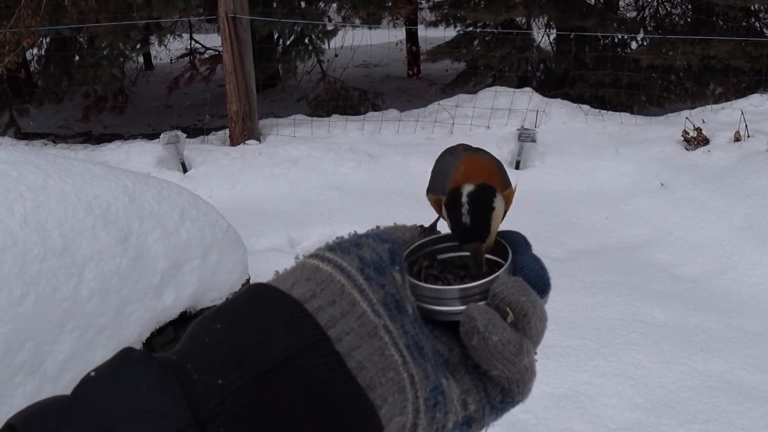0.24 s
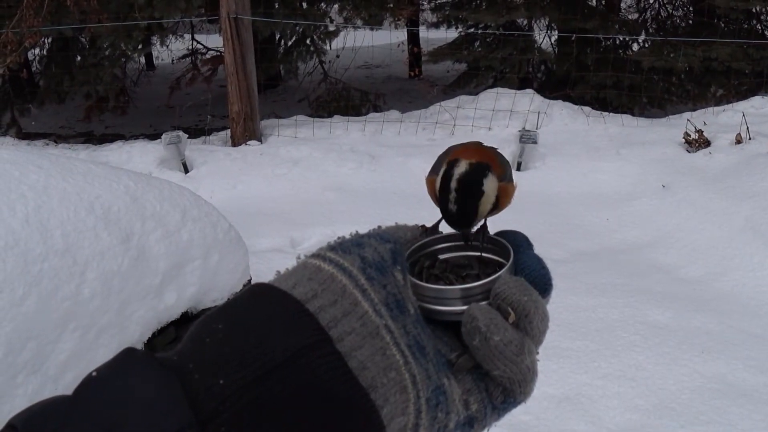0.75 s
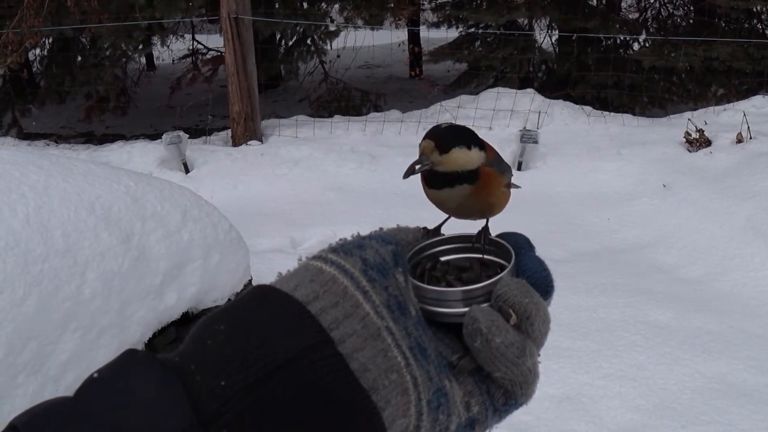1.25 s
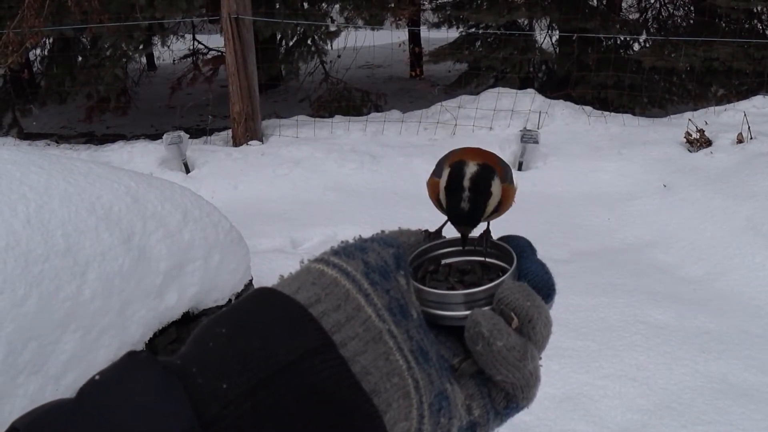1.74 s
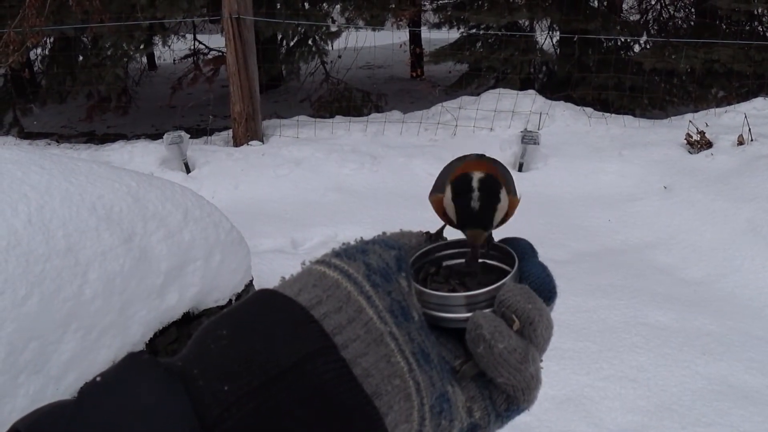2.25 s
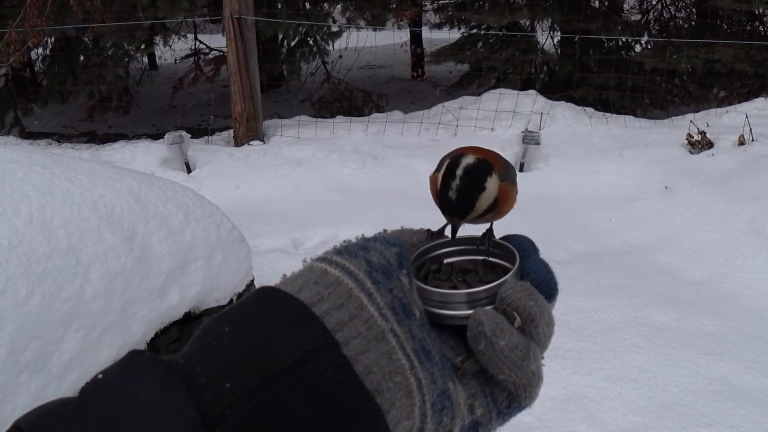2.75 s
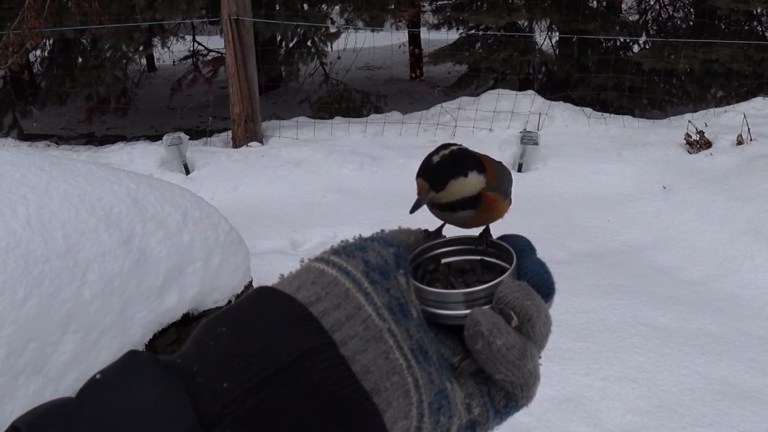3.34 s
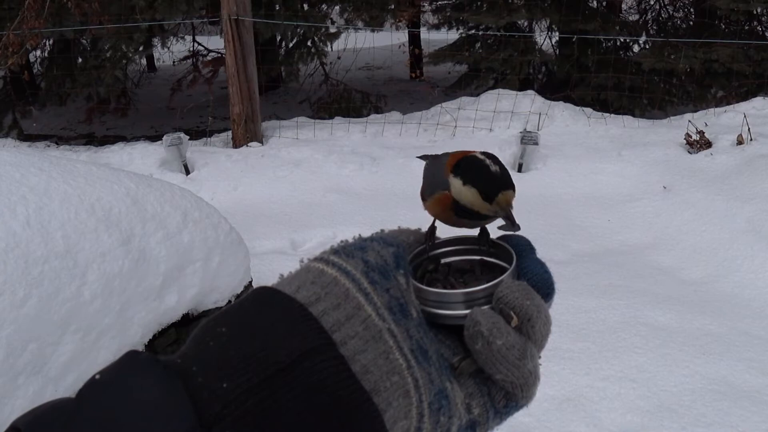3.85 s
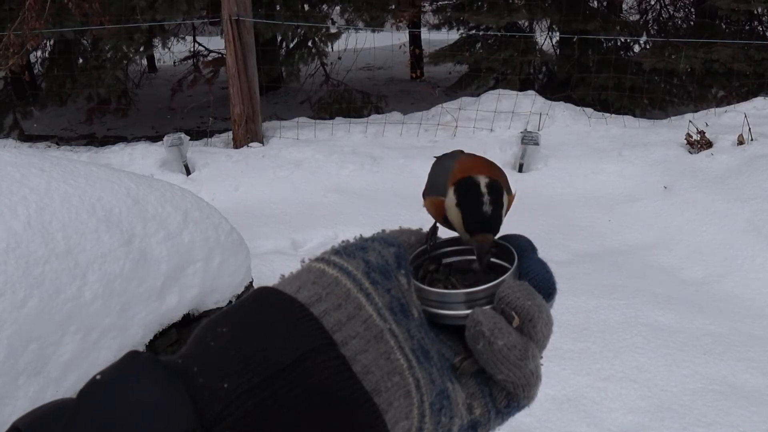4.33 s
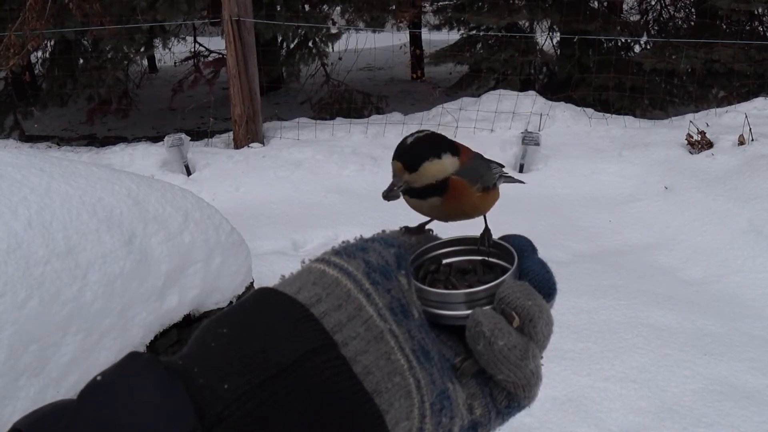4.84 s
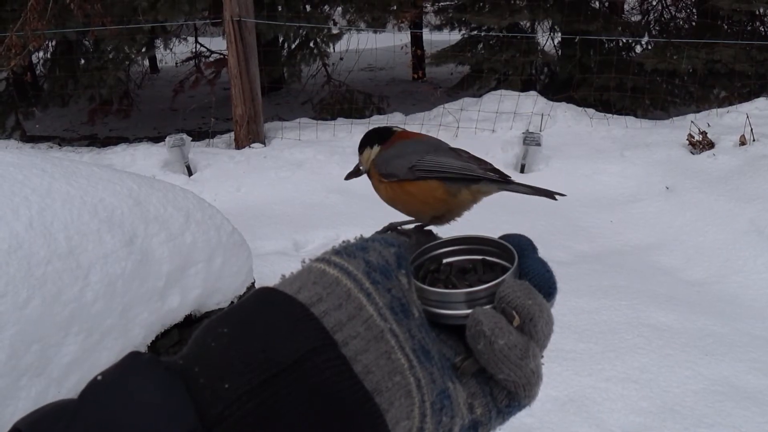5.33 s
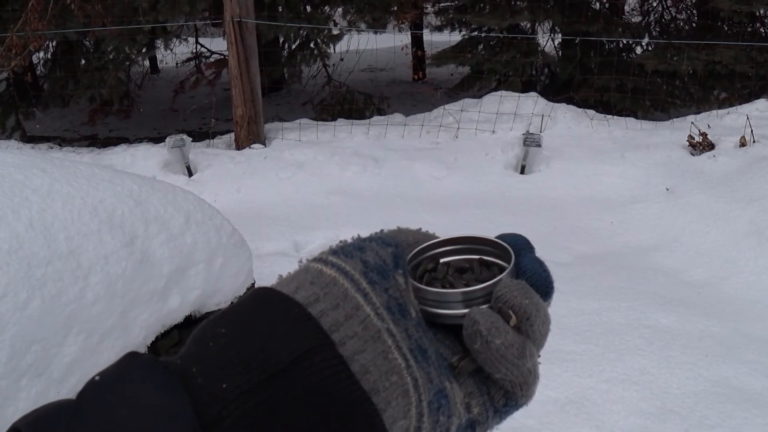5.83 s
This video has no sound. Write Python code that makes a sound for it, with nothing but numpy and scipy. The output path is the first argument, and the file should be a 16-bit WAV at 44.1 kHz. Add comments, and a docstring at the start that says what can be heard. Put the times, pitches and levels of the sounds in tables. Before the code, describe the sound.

Crisp beak taps and tiny seed rattles ring a little metal cup, with brief high bird calls, faint distant answers and a soft wing flurry at the end.

```python
"""A soft, wide hush of winter air lies under everything: coloured noise, drifting slightly, unlike in each ear.
A small tit on a gloved hand calls, and pecks seeds in a little steel tin: skidding blows ring its modes.
Peeps and answers from the trees are gliding near-sines; thuds, rubbing and rumble of the hand are low noise.
At the end the bird flies off on fading wingbeats, each a pulse of air and a feathery swish.
"""
import sys
import numpy as np
from scipy import signal
from scipy.fft import rfft, irfft, next_fast_len
from scipy.io import wavfile
from scipy.ndimage import uniform_filter1d

SR = 44100
rng = np.random.default_rng(int(sys.argv[2]) if len(sys.argv) > 2 else 0)


def unload_audio(sound):
    """Save the sound as a 16-bit wav file, at the path given as the first command line argument."""
    columns = np.transpose(np.atleast_2d(sound))
    # keep every value between -1 and 1, then stretch to whole-number steps
    steps = np.round(np.clip(columns, -1, 1) * 32767)
    wavfile.write(sys.argv[1], SR, steps.astype(np.int16))


N = 268348


def gain_of(db):
    """Decibels to amplitude."""
    return 10 ** (np.asarray(db) / 20)


def evened(x):
    """Scales to rms 1."""
    return x / np.sqrt(np.mean(x ** 2) + 1e-20)


def read(points, hz):
    """A spectrum joined by straight lines on a log-frequency axis."""
    f, value = np.transpose(points)
    return np.interp(np.log(hz + 1), np.log(f + 1), value)


def add(mix, s, sound):
    """Mixes a sound in at time s."""
    part = mix[max(round(s * SR), 0):][:len(sound)]
    part += sound[:len(part)]


def passband(low_hz, high_hz, order=2):
    """Design of a causal band-pass."""
    return signal.butter(order, [low_hz, min(high_hz, .49 * SR)], "band", fs=SR, output="sos")


def band(x, low_hz, high_hz, order=2):
    """Causal band-pass."""
    return signal.sosfilt(passband(low_hz, high_hz, order), x)


def ring(x, hz, width_hz):
    """One resonance with a peak gain of 1."""
    return signal.lfilter(*signal.iirpeak(hz, hz / width_hz, fs=SR), x)


def strokes(rows):
    """Level curve of smooth swells, one a row: middle, length, level."""
    level = np.zeros(N)
    for s, length, db in rows:
        swell = np.hanning(max(int(length * SR), 8))
        add(level, s - len(swell) / 2 / SR, gain_of(db) * swell)
    return level


def aftermath(rows, rise_s, decay_s):
    """Level curve that rises quickly at each (s, dB) and dies away; overlaps add in power."""
    power, t = np.zeros(N), np.arange(SR) / SR
    for s, db in rows:
        level = gain_of(db) * (1 - np.exp(-t / rise_s)) * np.exp(-t / decay_s)
        add(power, s, level ** 2)
    return np.sqrt(power)


def ticks(count, per_s, spread_db):
    """Tiny random snaps, a few larger than the rest."""
    struck = rng.random(count) < per_s / SR
    sign = rng.choice([-1, 1], count)
    return struck * sign * gain_of(spread_db * np.minimum(rng.exponential(1, count), 3))


# tonal balance of the still air: f/Hz, density/dB (relative, per Hz)
AIR_COLOUR = [(25, -46), (55, -40), (90, -19), (130, -20), (212, -7), (397, -1), (700, -1), (1740, -9.5),
              (2100, -13), (5250, -21), (8660, -21.5), (10100, -19.5), (11050, -23.5), (11500, -63),
              (12500, -80)]
# likeness of left and right: f/Hz, correlation/1
AIR_LIKENESS = [(60, 1), (130, 0.71), (270, 0.97), (580, 0.42), (1200, -0.37), (2600, -0.5), (5500, -0.016),
                (11000, 0.39)]
# lean of the air to the left: f/Hz, left minus right/dB
AIR_LEAN = [(60, 0.5), (110, 0.5), (190, 1.1), (350, 4.0), (630, 6.3), (1130, 3.3), (2030, 2.3),
            (3650, 0.38), (6560, 1.3), (11800, 4.1)]
# narrow bands lifted in the hiss: f/Hz, width/Hz, lift/dB
HISS = [(1923, 71, 7.5), (10250, 1280, 8)]
AIR_DB = -62  # rms of the two ears' mean


def air(patchy_db=1.0):
    """A far, even hush: noise with a fixed colour whose level drifts a little in time and pitch."""
    frames, hz = N // 512 + 5, np.fft.rfftfreq(2048, 1 / SR)
    a, b, c, d, patches = rng.standard_normal((frames, len(hz), 5)).T
    patches = evened(uniform_filter1d(uniform_filter1d(patches, 20, 0), 10, 1))
    same = np.clip(read(AIR_LIKENESS, hz), -1, 1)[:, None]
    side = gain_of(read(AIR_LEAN, hz))[:, None]
    left = a + 1j * b
    right = same * left + np.sqrt(1 - same ** 2) * (c + 1j * d)
    # keep the colour of the two ears' mean whatever their likeness
    ears = np.array([side * left, right]) / np.sqrt(1 + side ** 2 + 2 * same * side)
    lift_db = sum(db * np.exp(-(2 * (hz - f) / width) ** 2) for f, width, db in HISS)
    colour_db = read(AIR_COLOUR, hz) + lift_db
    spectrum = ears * gain_of(colour_db[:, None] + patchy_db * patches)
    hush = signal.istft(spectrum, nperseg=2048, noverlap=1536)[1][:, :N]
    return hush / hush.mean(0).std() * gain_of(AIR_DB)


# the hand trembles: at rest/dB, re a bump/dB, re a peck/dB, at take-off/dB
REST_DB, BUMP_SHAKE_DB, PECK_SHAKE_DB, TAKEOFF_SHAKE_DB = -105, -15.5, -49, -80
SHAKE_RISE_S, SHAKE_DECAY_S = 0.011, 0.083


def handling(lumpy_db=4.5):
    """Low, uneven rumble of the hand, stirred by every bump, peck and the take-off."""
    shared, left, right = band(rng.standard_normal((3, N)), 42, 169, order=3)
    tremor = evened(band(rng.standard_normal(N), 2.4, 13))
    jolts = [(s, db + BUMP_SHAKE_DB) for s, db, _ in HAND_BUMPS]
    jolts += [(s, db + PECK_SHAKE_DB) for s, db, *_ in BEAK_PECKS]
    jolts += [(TAKEOFF_S, TAKEOFF_SHAKE_DB)]
    level = gain_of(REST_DB) + aftermath(jolts, SHAKE_RISE_S, SHAKE_DECAY_S)
    rumble = evened(shared + 1.16 * np.array([left, right]))
    return rumble * level * gain_of(lumpy_db * np.tanh(tremor))


def whistle(hz, waver=0.0046, half_db=-19):
    """The syrinx sings a near sine; on a held pitch alternate cycles differ: a faint octave below."""
    hz = uniform_filter1d(hz, 130)
    drift = evened(uniform_filter1d(rng.standard_normal(len(hz)), 90))
    held = np.exp(-(np.gradient(hz) * SR / 30000) ** 2)
    phase = 2 * np.pi * np.cumsum(hz * (1 + waver * drift)) / SR
    octave_below = gain_of(half_db) * held * np.sin(phase / 2)
    return np.sqrt(2) * (np.sin(phase) + octave_below)


# calls that flick up, overshoot and hold: t/s, length/s, flick level/dB, held level/dB
FLICKED_CALLS = [(0.162, 0.094, -46, -60.5), (1.667, .083, -56, -54)]
CALL_START_HZ, CALL_HOLD_HZ, CALL_SWING_HZ, CALL_SETTLE_S = 5930, 7670, 30, .011
FLICK_S = 0.0064  # passage from flick to held level


def long_calls():
    """An upward flick, louder or softer than the hold, overshoots and settles like a damped spring."""
    out = np.zeros(N)
    for s, length, flick_db, hold_db in FLICKED_CALLS:
        t = np.arange(0, length, 1 / SR)
        swing = np.exp(-t / CALL_SETTLE_S) * np.cos(2 * np.pi * CALL_SWING_HZ * t)
        hz = CALL_HOLD_HZ + (CALL_START_HZ - CALL_HOLD_HZ) * swing
        level_db = hold_db + (flick_db - hold_db) * np.exp(-(t / FLICK_S) ** 2)
        add(out, s, whistle(hz) * gain_of(level_db) * signal.windows.tukey(len(t), .1))
    return out


# wall ring, moving with the spot struck, before detuning: multiple of wall pitch/1, width/Hz, level/dB
WALL_MODES = [(.76, 500, -10), (.9, 380, 1.5), (1, 415, 2), (1.17, 490, 0)]
# rim ring, damped by seeds and glove, before RIM_PITCH and detuning: f/Hz, width/Hz, level/dB
RIM_MODES = [(6450, 650, -5), (6950, 390, 1.5), (7490, 280, -1.5), (8130, 380, 2.5), (8350, 350, 2.5),
             (10230, 150, -1.5), (10820, 350, -4.5)]
RIM_PITCH = 0.98
# the range in which each part of the tin sounds: low f/Hz, high f/Hz
FLOOR_RANGE_HZ, WALL_RANGE_HZ, RIM_RANGE_HZ = (1096, 2600), (3120, 6230), (5560, 11800)


def clicks(contacts, floor_width_hz=520, skid=0.16, swell=0.056, swell_s=0.0011, snap=0.27,
           wall_snap=0.21, knock=0.048, uneven_db=2.5, detune=0.027):
    """A sharp blow, with a brief noisy swell into it and a short skid, rings floor, wall and rim."""
    out, t = np.zeros(N), np.arange(-128, 640) / SR
    ranges = passband(*FLOOR_RANGE_HZ), passband(*WALL_RANGE_HZ), passband(*RIM_RANGE_HZ, order=3)

    def answer(blow, modes, pitch):
        """Each mode answers with a slightly random level and pitch at every contact."""
        total = 0
        for k, (f, width, db) in enumerate(modes):
            gain = (-1) ** k * gain_of(db + uneven_db * rng.standard_normal())
            hz = f * pitch * (1 + detune * rng.uniform(-1.34, 1))
            total = total + gain * ring(blow, hz, width)
        return total

    for s, db, floor_db, rim_db, floor_hz, wall_hz, skid_s in contacts:
        rub = np.where(t < 0, swell * np.exp(-abs(t) / swell_s), skid * np.exp(-abs(t) / skid_s))
        blow = (t == 0) + rub * rng.standard_normal(len(t))
        # a blow that reaches the bare floor rings lower and longer than one cushioned by seeds
        floor = ring(blow, floor_hz, floor_width_hz * min(floor_hz / 2000, 1) ** 4)
        # the dry snap of the husk fills the valleys between the modes
        rings = (floor + knock * blow,
                 answer(blow, WALL_MODES, wall_hz) + wall_snap * blow,
                 answer(blow, RIM_MODES, RIM_PITCH) + snap * blow)
        click = np.zeros(len(t))
        for sos, x, part_db in zip(ranges, rings, (floor_db, 0, rim_db)):
            part = signal.sosfilt(sos, x)
            click += gain_of(db + part_db) * part / np.linalg.norm(part)
        add(out, s + t[0], click * np.sqrt(SR / 1000))  # levels are energy spread over a millisecond
    return out


# spacing of the jostled seeds, their fall over a rattle, their unevenness
RATTLE_STEP_S, RATTLE_FADE_DB, RATTLE_SPREAD_DB = .0042, -8.5, 4.5
RATTLE_FLOOR_DB, RATTLE_RIM_DB = -4, 0  # re their level on the wall
LIGHT_FLOOR_HZ, LIGHT_WALL_HZ = 2130, 4450  # how the tin answers a light knock
GRIP_SKID_S, STRIKE_SKID_S, SEED_SKID_S = 0.00038, 0.00054, 0.00095  # decay of each sliding contact


def rattle(s, db, length, count=9):
    """Jostled seeds knock at uneven steps, on the whole ever more weakly."""
    for k, (late, strength, spot) in enumerate(rng.uniform(-1, 1, (count, 3))):
        after = RATTLE_STEP_S * (k + 1 + .3 * late)
        fall_db = RATTLE_FADE_DB * min(after / length, 3) ** 2 + RATTLE_SPREAD_DB * strength
        floor_hz, wall_hz = LIGHT_FLOOR_HZ * (1 + 0.091 * spot), LIGHT_WALL_HZ * (1 - 0.082 * spot)
        yield s + after, db + fall_db, RATTLE_FLOOR_DB, RATTLE_RIM_DB, floor_hz, wall_hz, SEED_SKID_S


# beak strikes, each with a second closing and a rattle of seeds:
# t/s, strike level on the wall/dB, floor re wall/dB, rim re wall/dB, floor f/Hz, wall f/Hz,
# grip delay/s, grip re strike/dB, rattle re strike/dB, rattle length/s
BEAK_PECKS = [(0.188, -45, -13, 1.5, 2060, 4550, .0028, 4, 3, 0.0064),
              (0.1985, -35.5, -10.5, 2, 1970, 5100, .0056, -18, -18, 0.018),
              (0.4919, -37, 2, 2.5, 2000, 4740, 0.0082, 0.5, -28, 0.0089),
              (0.8838, -37.5, 3, 4, 2000, 4450, .002, 1, -12, .004),
              (0.8884, -29, 5.5, 5.5, 1660, 4260, .0019, -1, -6, 0.027),
              (0.9612, -37, 5, 4, 2060, 4200, .014, -5, -2, .018),
              (.9991, -41, -7, -5, 2130, 4170, .0069, -7, -22, .01),
              (1.429, -43.5, -0.5, 3, 2120, 4270, .002, 3.5, -5, 0.019),
              (2.1479, -31.5, 7.5, 9.5, 1890, 4660, .006, -15, 1.5, 0.009),
              (2.189, -43, -5, -0.5, 2200, 4100, 0.0077, -6, -16, .01),
              (2.2329, -33.5, 0, 6.5, 2060, 4800, 0.0052, 2.5, -14, .01),
              (2.2578, -45.5, -7, -14, 1990, 4600, .0038, 0.5, -11, 0.0089),
              (2.6184, -46.5, 5, 0, 2000, 4420, 0.0031, 6, 6, .014),
              (2.6352, -33, -4.5, -4, 2220, 4320, .0121, -13, -5, 0.0055),
              (3.0446, -39, -1.5, 1, 2150, 4550, 0.0042, -10, -13, 0.0095),
              (3.3735, -42, -5, -2.5, 2050, 4250, 0.0039, 0, -9, 0.013),
              (3.5604, -47.5, 4, -11, 1970, 4400, .0015, -15, -20, .004),
              (3.7038, -35.5, -7, 3.5, 2020, 4320, 0.0061, -3, 0.5, 0.0092),
              (4.0341, -42.5, -9, 2, 2050, 4300, 0.0054, -2, -16, 0.0046),
              (4.0438, -41.5, -12, 1, 2180, 4340, 0.0062, 8, -14, 0.0036),
              (4.2925, -42.5, -7, -13, 2150, 4720, .002, 3, 6, 0.0059)]


def pecks():
    """The beak strikes, grips at the same spot, and stirs the seeds."""
    contacts = []
    for row in BEAK_PECKS:
        s, db, floor_db, rim_db, floor_hz, wall_hz, grip_s, grip_db, rattle_db, rattle_s = row
        spot = floor_db, rim_db, floor_hz, wall_hz
        contacts.append((s, db, *spot, STRIKE_SKID_S))
        contacts.append((s + grip_s, db + grip_db, *spot, GRIP_SKID_S))
        contacts.extend(rattle(s, db + rattle_db, rattle_s))
    return clicks(contacts)


# soft bumps of the hand as the bird shifts: t/s, level/dB, f/Hz
HAND_BUMPS = [(0.231, -58.5, 170), (0.519, -52.5, 130), (.585, -57, 130), (.612, -51.5, 132),
              (0.644, -60, 122), (.84, -61, 150), (0.933, -46.5, 158), (.985, -61, 139), (1.07, -65, 112),
              (1.47, -61.5, 124)]


def bumps(decay_s=0.011):
    """Dull, quickly damped thuds: a low sine roughened by low noise."""
    out, t = np.zeros(N), np.arange(SR // 8) / SR
    for s, db, hz in HAND_BUMPS:
        thud = np.sin(2 * np.pi * hz * t) + 0.78 * evened(band(rng.standard_normal(len(t)), 51, 255))
        add(out, s, gain_of(db) * thud * (1 - np.exp(-t / 0.0019)) * np.exp(-t / decay_s))
    return out


# light single clicks on the tin: t/s, level on the wall/dB, floor re wall/dB, rim re wall/dB
LIGHT_CLICKS = [(0.246, -56.5, -10, 5), (0.268, -57, -11, 2), (0.326, -60, -7, 3), (0.9241, -39.5, -9, 3),
                (0.9917, -50, 1, -12), (1.0609, -57, -14, 3), (1.132, -57, -14, 1.5), (1.46, -52, 1.5, 2),
                (2.1719, -50, -3, -8), (2.2782, -48, 2.5, 2), (2.347, -54, -16, 2), (3.1127, -57, -13, 3),
                (3.172, -58, -13, 5), (3.2503, -58, -13, 2.5), (3.3622, -52, -16, -6),
                (3.7224, -54, -5, -10), (3.775, -55, -16, 3), (3.8288, -52.5, -15, 3),
                (3.894, -54, -16, 2.5), (4.3127, -52, -1, -5), (4.3293, -51, -10, -10),
                (4.3686, -54.5, -6, 1), (4.4303, -51.5, -9, -3.5), (4.4998, -55.5, -6, 2),
                (4.9236, -60.5, 6.5, 1), (5.5317, -46.5, -6, 0.5)]


def light_clicks(skid_s=0.0015):
    """Light single clicks on the tin, from seeds or a small peck, each with a longer skid."""
    return clicks((s, db, floor_db, rim_db, LIGHT_FLOOR_HZ, LIGHT_WALL_HZ, skid_s)
                  for s, db, floor_db, rim_db in LIGHT_CLICKS)


# claws and beak scraping: middle t/s, length/s, level/dB
SCRAPES = [(.39, .009, -62), (1.36, .015, -66.5), (2.215, 0.042, -59.5), (4.74, 0.07, -69),
           (4.827, .02, -66), (4.864, 0.019, -65), (4.94, 0.19, -71), (5.075, 0.046, -68),
           (5.54, 0.055, -62)]
# husks settling: level after a peck of -35 dB, dB per dB of the peck, decay
HUSK_DB, HUSK_FOLLOW, HUSK_S = -66.5, 0.8, 0.042


def scratches():
    """Claws catch and slip, and husks settle after each peck, in clusters of ticks."""
    settling = [(s, HUSK_DB + HUSK_FOLLOW * (db + 35)) for s, db, *_ in BEAK_PECKS]
    husks = aftermath(settling, .004, HUSK_S)
    grit = evened(band(ticks(N, per_s=1300, spread_db=1.5), 3600, 7500))
    return grit * (strokes(SCRAPES) + husks)


# short scooped peeps: t/s, length/s, first f/Hz, last f/Hz, sag in the middle/Hz, level/dB
SCOOPED_PEEPS = [(.397, .016, 5800, 9200, 200, -57.5), (.418, 0.016, 8200, 9000, 1150, -56.5),
                 (.435, 0.022, 7800, 8300, 1500, -62), (0.664, 0.015, 6500, 8250, 300, -65),
                 (0.689, 0.048, 8000, 7800, 798, -70), (.732, .02, 6760, 8400, 300, -66.5),
                 (1.017, .018, 6140, 8500, -600, -63), (1.312, 0.014, 6500, 8600, 250, -66),
                 (1.745, 0.014, 7600, 9100, -400, -63), (5.864, 0.026, 5960, 8000, -900, -63.5)]


def peeps():
    """Thin contact notes, each one scoop or arch of pitch."""
    out = np.zeros(N)
    for s, length, first_hz, last_hz, sag_hz, db in SCOOPED_PEEPS:
        u = np.linspace(0, 1, int(length * SR))
        hz = first_hz + (last_hz - first_hz) * u - sag_hz * np.sin(np.pi * u)
        add(out, s, whistle(hz) * gain_of(db) * signal.windows.tukey(len(u), .5))
    return out


# short answers from the trees: t/s, length/s, first f/Hz, last f/Hz, level/dB
TREE_ANSWERS = [(2.065, 0.048, 6450, 6850, -75), (2.193, 0.063, 8830, 8300, -63),
                (2.522, 0.06, 8700, 8350, -75), (2.955, 0.051, 7550, 6950, -73.5),
                (3.074, 0.051, 7250, 6870, -70.5), (3.265, 0.048, 8650, 8250, -73),
                (3.462, 0.022, 6700, 6820, -69), (4.178, 0.056, 8750, 8250, -70.5),
                (4.60, 0.058, 8600, 8350, -69.5), (4.725, 0.032, 7170, 6500, -68.5),
                (5.694, 0.046, 7100, 6570, -71)]


def answers():
    """Short gliding notes, wavering more, from birds further off."""
    out = np.zeros(N)
    for s, length, first_hz, last_hz, db in TREE_ANSWERS:
        hz = np.linspace(first_hz, last_hz, int(length * SR))
        add(out, s, gain_of(db) * whistle(hz, waver=0.015) * signal.windows.tukey(len(hz), .7))
    return out


# soft rubbing on the wool glove: middle t/s, length/s, level/dB
GLOVE_RUBS = [(4.85, 1, -68), (5.083, 0.059, -59.5), (5.15, .12, -67.5), (5.78, 0.41, -69)]


def glove():
    """Wool rubs dully under the bird's feet: swells of band-passed noise."""
    return evened(band(rng.standard_normal(N), 370, 646, order=3)) * strokes(GLOVE_RUBS)


# take-off: the first full wingbeat, then ever fainter ones as the bird leaves
TAKEOFF_S, WINGBEAT_S, PUSH_DB, SWISH_DB, LEAVING_DB_PER_S = 5.566, .0433, -51.5, -58.5, -55


def wings(push_hz=280, push_s=0.0015, swish_at=0.013, swish_s=0.014, eddy_db=-5, count=6):
    """Each downstroke pushes a pulse of air, then the feathers brush past one another."""
    out, t = np.zeros(N), np.arange(SR // 16) / SR
    for flown_s in np.arange(count) * WINGBEAT_S:
        since = t - .0035
        push = np.sqrt(2) * np.sin(2 * np.pi * push_hz * since) * np.exp(-.5 * (since / push_s) ** 2)
        stroke = np.exp(-.5 * ((t - swish_at) / swish_s) ** 2)
        eddies = gain_of(eddy_db) * evened(band(rng.standard_normal(len(t)), 270, 790)) * stroke
        feathers = ticks(len(t), per_s=3500, spread_db=5)
        swish = evened(band(feathers, 830, 8600, order=1)) * stroke
        beat = gain_of(PUSH_DB) * (push + eddies) + gain_of(SWISH_DB) * swish
        add(out, TAKEOFF_S + flown_s, gain_of(LEAVING_DB_PER_S * flown_s) * beat)
    return out


def place(x, ports):
    """Two close microphone ports hear a source with slightly different level and phase."""
    size = next_fast_len(N, real=True)
    hz, (f, side_db, lead) = np.fft.rfftfreq(size, 1 / SR), np.transpose(ports)
    left, turn = gain_of(np.interp(hz, f, side_db)), np.exp(.5j * np.interp(hz, f, lead))
    pair = np.array([left * turn, 1 / turn])
    # the mean of the two ports keeps the source's level
    return irfft(rfft(x, size) * pair / abs(pair.mean(0)), size)[:, :N]


def garden(x, t60, delay):
    """Thin scatter from fence and trees: sparse fading echoes, different in each ear."""
    t = np.arange(SR // 2) / SR
    sparse = rng.standard_normal((2, len(t))) * (rng.random((2, len(t))) < .1)
    taps = sparse * gain_of(-60 * t / t60) * (t > delay)
    taps /= np.linalg.norm(taps, axis=1, keepdims=True)
    return signal.fftconvolve(x[None], taps, axes=1)[:, :N]


# how the two ports hear tin, birds and low sounds: f/Hz, left minus right/dB, lead of the left/rad
PORTS_TIN = [(300, 1, 0), (1100, 10, -0.073), (2000, 10.5, -1.54), (3680, 4.5, -1.07), (6500, 4, -.85),
             (9000, 1, -1.1), (11500, -1.5, -0.14)]
PORTS_BIRD = [(3800, 3.8, -0.88), (8000, 2.2, -0.88)]
PORTS_LOW = [(100, -1.5, 1), (250, 1, 0.72), (600, 13, -0.35), (8000, 2, -0.91)]


def scene():
    """Tin and bird at arm's length; snow swallows nearly all echo."""
    tin = pecks() + light_clicks() + scratches()
    near, far = long_calls() + peeps(), answers()
    close = place(tin, PORTS_TIN) + gain_of(-14.0) * garden(tin, t60=0.02, delay=.002)
    close += gain_of(-31) * garden(tin, t60=0.43, delay=0.012)
    birds = place(near + far, PORTS_BIRD)
    birds += gain_of(-7) * garden(near, t60=.18, delay=.003)
    birds += gain_of(-2) * garden(far, t60=.12, delay=.002)
    low = place(bumps() + wings() + glove(), PORTS_LOW)
    return close + birds + low + handling() + air()


EDGE_HZ = 11180


def record(dry):
    """A band limit: a steep edge near 11 kHz with a very faint level above it."""
    edge = signal.firwin(241, EDGE_HZ, window=("kaiser", 6), fs=SR)
    faint_top = gain_of(-34) * signal.firwin(241, 16000, fs=SR)
    return signal.oaconvolve(dry, (edge + faint_top)[None], "same")


dry = scene()
out = record(dry)
unload_audio(out)
```